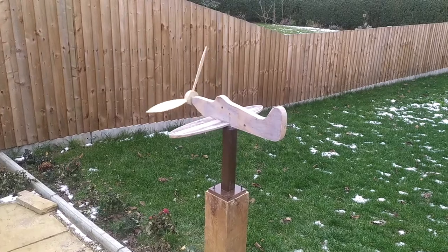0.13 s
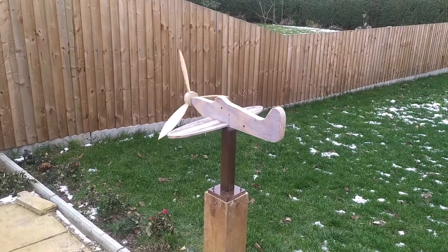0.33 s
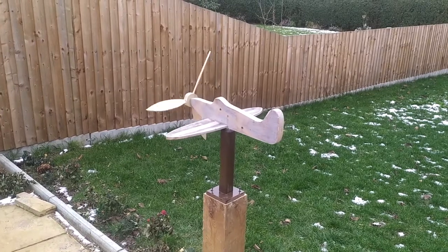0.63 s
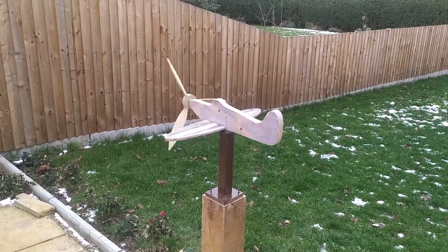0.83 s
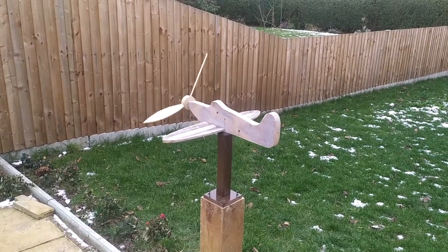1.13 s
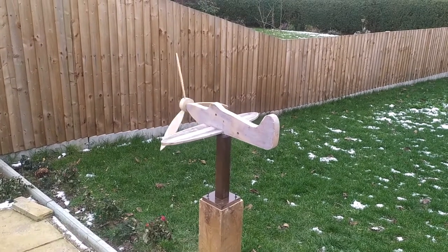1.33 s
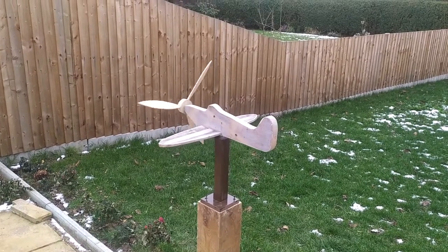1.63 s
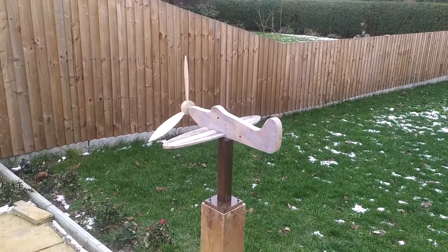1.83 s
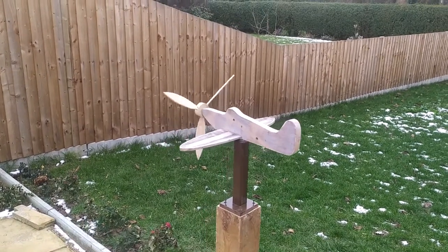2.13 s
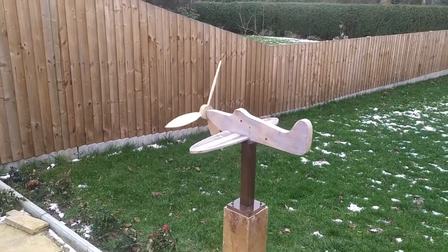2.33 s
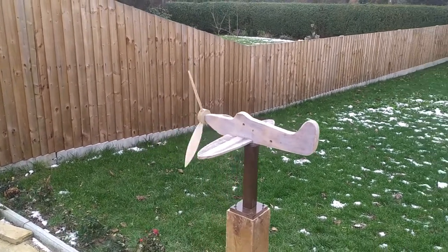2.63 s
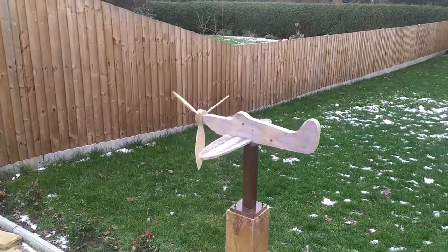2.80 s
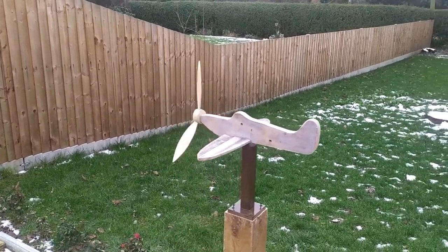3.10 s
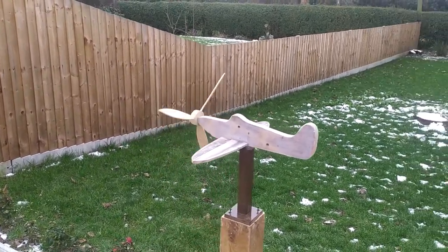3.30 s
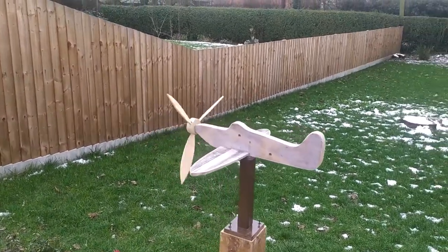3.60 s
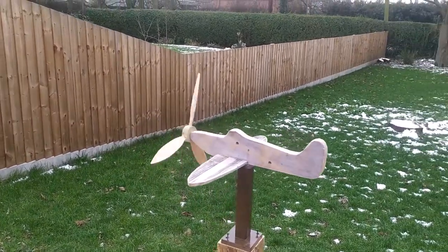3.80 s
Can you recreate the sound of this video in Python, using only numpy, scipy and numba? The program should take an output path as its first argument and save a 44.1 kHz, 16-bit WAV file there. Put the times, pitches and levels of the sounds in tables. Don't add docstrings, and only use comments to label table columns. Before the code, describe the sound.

Wind buffeting dominates, uneven between left and right, with low flutter, knocks and snaps, a brief lull and a strong distorted gust near three seconds; soft leaf hiss, distant town hum and tiny chirps lie underneath.

```python
import sys
import numpy as np
from scipy import signal
from scipy.io import wavfile
from numba import njit

SR = 44100
rng = np.random.default_rng(int(sys.argv[2]) if len(sys.argv) > 2 else 0)


def unload_wav(signal):
    wavfile.write(
        sys.argv[1],
        SR,
        np.round(np.clip(np.atleast_2d(signal).T, -1, 1) * 32767).astype(np.int16),
    )


def volts(x):
    e = np.asarray(x, float) / 20
    return 10 ** e


N = 174195
RUN_IN = 4000


def to_level(x, db):
    return x * volts(db) / np.sqrt(np.mean(x ** 2))


def run_in(x):
    lead = [(0, 0)] * (x.ndim - 1) + [(RUN_IN, 0)]
    return np.pad(x, lead, "reflect")


@njit
def moving_filter(x, hz, damping):
    out = np.empty((2, len(x)))
    band, low = 0., 0.
    for i in range(len(x)):
        g = np.tan(np.pi * hz[i] / SR)
        v = (band + g * (x[i] - low)) / (1 + g * (g + damping))
        out[0, i] = low + g * v
        out[1, i] = damping * v
        band, low = 2 * v - band, low + 2 * g * v
    return out


def walk(rate):
    smoother = signal.butter(2, rate / 2, fs=SR, output="sos")
    wander = signal.sosfilt(smoother, rng.standard_normal(N + SR))[SR:]
    return wander / wander.std()


def kink(kicks, top_hz):
    ring_hz = 360
    dull = moving_filter(kicks, np.full(N, 1. * ring_hz), 1.6)[0]
    return moving_filter(dull, np.clip(top_hz, 300, 12000), 1.5)[0] * SR / ring_hz


def buffet(t, eddies, side):
    # start_s, level_db, left_minus_right_db
    breeze = [
        (0.0, -20, 1),
        (1.96, -27, 10),
        (2.72, -28, 6),
        (3.04, -16, 6.5),
        (3.95, -30.5, 5.5),
    ]
    breeze_s, breeze_db, pan_db = np.array(breeze).T
    u = t[::32]
    swirl_db = 3 * walk(16.6)[::32]
    power = volts(np.interp(u, breeze_s, breeze_db + side * pan_db / 2) + 4 + swirl_db) ** 2
    speed = power * 2.5
    for start_s, length_s, level_db, eddy_speed_db in eddies:
        spread_s = 0.59 * length_s
        puff = volts(level_db + 2) ** 2 * np.exp(-np.abs((u - start_s) / spread_s) ** 3.07)
        power = power + puff
        speed = speed + puff * eddy_speed_db
    speed_db = np.interp(t, u, np.minimum(speed / power, 9))
    power = np.interp(t, u, power)

    flutter_db = 1.88 * speed_db / 8 * walk(108)
    corner_hz = np.clip(44.8 * volts(2 * (speed_db + flutter_db)), 30, 2500)
    grain = to_level(rng.standard_normal(N) * volts(3.5 * rng.exponential(size=N)), 0)
    push = grain * np.sqrt(power * SR / corner_hz / 2)
    air = moving_filter(run_in(push), run_in(corner_hz), 1.73)[0]
    fine_hz = np.clip(5 * corner_hz, 30, 18000)
    rumble = moving_filter(air, run_in(fine_hz), 1.53)[0][RUN_IN:]

    gale_db, kicks_per_s = -12, 700
    kicks = (rng.random(N) < kicks_per_s / SR) * rng.standard_normal(N)
    kicks = kicks * volts(2.5 * rng.exponential(size=N))
    strength = power / volts(gale_db) * volts(-50 + 3.5 * speed_db)
    return rumble + kink(kicks * strength, 4.77 * corner_hz * power / volts(gale_db) ** 2)


def wind(t):
    # centre_s, length_s, level_db, air_speed_db (over calm)
    left_eddies = [(0.282, 0.0087, -22, 12), (0.391, 0.023, -11.5, 5), (0.554, 0.016, -16.5, 6),
                   (0.624, 0.034, -19.5, 7), (0.718, 0.035, -8.5, 3.5), (0.758, 0.049, -15.5, 5.5),
                   (0.972, 0.068, -10.5, 2.5), (1.028, 0.031, -16.5, 7.5), (1.191, 0.04, -9, 2.5),
                   (1.374, 0.03, -14, 4), (1.567, 0.038, -9, 4), (1.645, 0.024, -10, 6.5),
                   (1.705, 0.059, -17, 6.5), (1.897, 0.096, -13, 3.5), (1.946, 0.07, -19.5, 8.5),
                   (2.108, 0.074, -17.5, 4), (2.253, 0.012, -11.5, 4), (2.467, 0.027, -19.5, 8),
                   (3.014, 0.051, -13.5, 13), (3.047, 0.024, -11.5, 13), (3.114, 0.078, -13, 9.5),
                   (3.242, 0.026, -9.5, 7), (3.285, 0.02, -9, 5.5), (3.418, 0.022, -8.5, 6),
                   (3.45, 0.043, -16.5, 6.5), (3.571, 0.017, -24.5, 10.5), (3.695, 0.0092, -29, 19),
                   (3.942, 0.075, -14, 4.5)]
    right_eddies = [(0.0, 0.012, -7, 5.3), (0.017, 0.0047, -14, 7.8), (0.095, 0.025, -13.5, 5.2),
                    (0.204, 0.021, -15, 3.65), (0.338, 0.037, -10.5, 3.57), (0.412, 0.024, -20, 4),
                    (0.422, 0.03, -23.5, 8.6), (0.532, 0.016, -19, 16.7), (0.605, 0.015, -12.5, 6.3),
                    (0.66, 0.12, -19, 6.3), (0.705, 0.02, -14.5, 6.2), (0.645, 0.32, -15.5, 2.3),
                    (0.833, 0.046, -14, 7.06), (0.917, 0.053, -13, 5.95), (0.991, 0.046, -11, 3.67),
                    (1.127, 0.031, -22.5, 20), (1.128, 0.083, -13, 4.13), (1.366, 0.042, -10, 1.3),
                    (1.496, 0.039, -10, 2.2), (1.661, 0.044, -19.5, 2.4), (2.027, 0.0079, -15, 3.4),
                    (2.79, 0.037, -11, 0.85), (2.879, 0.014, -15, 4.5), (2.933, 0.019, -30, 3.7),
                    (2.976, 0.011, -19, 7.2), (3.086, 0.023, -10.5, 5.5), (3.171, 0.029, -13.5, 4.8),
                    (3.227, 0.009, -21.5, 11), (3.184, 0.38, -18, 4.3), (3.432, 0.046, -6, 3.4),
                    (3.515, 0.014, -22, 4), (3.632, 0.028, -14.5, 1.45)]
    return np.array([buffet(t, left_eddies, 1), buffet(t, right_eddies, -1)])


def coloured(points):
    point_hz, point_db = np.array(points).T
    out, likeness = 0, 0.1
    for hz in np.geomspace(300, 15000, 11):
        mid, side = (moving_filter(rng.standard_normal(N), np.full(N, hz), .5)[1] for _ in range(2))
        db = np.interp(np.log(hz), np.log(point_hz), point_db, left=-40) + 2.0 * walk(1.58)
        pair = np.sqrt(1 + likeness) * mid + np.sqrt(1 - likeness) * side * np.array([[1], [-1]])
        out = out + volts(db) * pair
    return out


def hedge(t):
    # start_s, level_db, left_minus_right_db, top_hz
    hiss = [(0, -59.5, 9.5, 15000), (.3, -53.5, 5.5, 15000), (.55, -53.5, 9, 14000), (.72, -53, 8, 15000),
            (.85, -61, 12, 14000), (1.3, -58.5, 3.5, 14000), (1.7, -58.5, 4, 14000), (2.1, -63, 6.5, 13500),
            (2.6, -62.5, 5, 13500), (3, -60.5, 9, 13500), (3.15, -59.5, 1.5, 10000),
            (3.95, -63.5, 5, 11500)]
    # band_hz, level_db
    leaf_colour = [(1470, -18), (2500, -32), (3890, 7.5), (5010, -7.5), (9950, 11), (13800, -66),
                   (14500, 26), (15500, -16.5)]
    start_s, level_db, pan_db, top_hz = np.array(hiss).T
    pan = np.interp(t, start_s, pan_db) / 2
    top = np.interp(t, start_s, top_hz)
    leaves = np.array([moving_filter(x, top, 1.4)[0] for x in to_level(coloured(leaf_colour), 0)])
    rustle_db = 1.5 * walk(22)
    return leaves * volts(np.interp(t, start_s, level_db) + rustle_db + np.array([pan, -pan]))


def town_and_road():
    # band_hz, level_db
    town_colour = [(300, -16), (700, 6.5), (1200, -13.5), (1900, 20.5), (2500, -35), (4000, -1.5),
                   (8000, -37)]
    tyre_band = signal.butter(3, [1300, 2120], "band", fs=SR, output="sos")
    road = signal.sosfilt(tyre_band, rng.standard_normal((2, N)))
    return to_level(coloured(town_colour), -57) + to_level(road, -63.5)


def knocks(t):
    # start_s, peak_db, left_minus_right_db
    table = [(0.012, -36, -16), (0.089, -26.5, -18), (0.342, -25, 2), (0.391, -25, 5), (0.517, -19, -20),
             (0.533, -24, -17), (0.604, -24.5, -7), (0.681, -30, 11), (0.698, -16, 10), (0.759, -26, 4),
             (0.817, -24, -22), (0.909, -22, -20), (0.971, -29, 11), (0.992, -18, -4.5), (1.02, -19, 19),
             (1.046, -16, 20.0), (1.091, -33, -14.0), (1.12, -18, -22.0), (1.365, -39, 14.5),
             (1.546, -18, 26.5), (1.636, -21, 26), (1.707, -31, 19.5), (1.893, -26, 17.0), (1.906, -22, 25),
             (1.94, -25, 24), (1.979, -31.5, 12.0), (2.452, -45, 18), (2.47, -24, 22), (2.789, -27.5, -8),
             (2.965, -26, 3), (3.221, -22, 9), (3.247, -19, 17), (3.279, -30, 11), (3.402, -35, 4.5),
             (3.416, -17.5, -1.5), (3.892, -26, 17), (3.919, -40, 10.5)]
    rise_s, fall_s = 0.0022, 0.0033
    out = np.zeros((2, N))
    for (start_s, peak_db, pan_db), chance in zip(table, rng.standard_normal((len(table), 2))):
        on = (t > start_s) & (t < start_s + .05)
        u = t[on] - start_s
        hz = 617 * np.exp(0.27 * chance[0])
        wobble = np.sin(2 * np.pi * hz * u * (1 - 8 * u)) * np.sign(chance[1])
        swell = (1 - np.exp(-u / rise_s)) * np.exp(-u / fall_s)
        gain = volts(peak_db + 5.5 + np.minimum(0, np.array([[pan_db], [-pan_db]])))
        out[:, on] += gain * wobble * swell
    return out


def gliding_notes(t, table, trill_db, waver_share):
    out = np.zeros(N)
    waver = waver_share * walk(160)
    trill = volts(trill_db * walk(90))
    for start_s, length_s, pitch_hz, level_db, end_ratio in table:
        on = (t >= start_s) & (t < start_s + length_s)
        u = (t[on] - start_s) / length_s
        hz = pitch_hz * end_ratio ** u * (1 + waver[on])
        out[on] += volts(level_db) * np.sin(np.pi * u) ** 0.2 * np.sin(2 * np.pi * np.cumsum(hz) / SR)
    out = out * trill
    tail_s, fade_s = np.arange(SR // 4) / SR, .2
    echo = rng.standard_normal((2, len(tail_s))) * volts(-60 * tail_s / fade_s)
    echo *= volts(-3) / np.sqrt(np.sum(echo[0] ** 2))
    return out + signal.fftconvolve([out], echo, axes=1)[:, :N]


def chirps(t):
    # start_s, length_s, pitch_hz, level_db, end_pitch_over_start_pitch
    table = [(0.026, 0.032, 7840, -57, 0.98), (0.183, 0.078, 8250, -56, 1.0),
             (0.158, 0.21, 5950, -66.5, 0.98), (0.827, 0.11, 8530, -66, 0.93),
             (1.608, 0.072, 10800, -67, 0.93), (1.666, .035, 9500, -66, 0.89),
             (1.757, 0.037, 9150, -62, 1.0), (1.775, 0.13, 9540, -60, 1.0), (1.89, 0.046, 9820, -71, 1.05),
             (2.477, 0.03, 7700, -61, 0.97), (3.171, 0.09, 5780, -64.5, .99),
             (3.258, 0.065, 6000, -59.5, 1.0), (3.662, 0.03, 9300, -70, .99),
             (3.712, 0.065, 8900, -63, .98), (3.72, 0.079, 10750, -66, 0.89),
             (3.817, 0.045, 9600, -62, 0.94), (3.82, 0.034, 8700, -61, 1.24)]
    return gliding_notes(t, table, 4, .009)


def snaps():
    # start_s, level_db, half_left_minus_right_db
    table = [(0.391, -34, 13), (0.6986, -43, 8), (0.82, -24, -12), (0.826, -35, -15), (0.855, -42, -12),
             (0.9928, -42, -1), (1.0211, -38, 14), (1.126, -41, -11), (1.5469, -27, 12), (1.6469, -28, 16),
             (2.9963, -16, 22.5), (3.008, -27, 20), (3.017, -17, 18), (3.024, -32, 20), (3.040, -25, 18),
             (3.05, -37, 18.5), (3.0893, -19.5, 15), (3.105, -25, 15), (3.112, -25.5, 16),
             (3.128, -28.5, 15), (3.139, -36, 16), (3.2464, -41, 18), (3.281, -26, 7.5), (3.418, -28, 14)]
    start_s, level_db, pan_db = np.array(table).T
    kicks = np.zeros((2, N))
    port_db = np.minimum(0, 2 * np.array([pan_db, -pan_db]))
    signs = np.sign(rng.standard_normal(len(start_s)))
    kicks[:, (start_s * SR).astype(int)] = signs * volts(level_db + 6.5 + port_db)
    lag_s, shocks_per_s, fade_s = np.arange(600) / SR, 600, 0.0039
    after = (rng.random(len(lag_s)) < shocks_per_s / SR) * rng.standard_normal(len(lag_s))
    after = after * volts(-2.5) * np.exp(-lag_s / fade_s / 2)
    kicks = kicks + signal.fftconvolve(kicks, [after], axes=1)[:, :N]
    top_hz = np.interp(np.arange(N) / SR, start_s, 8000 * volts(0.47 * (level_db + 35)))
    return np.array([kink(k, top_hz) for k in kicks])


def ticks(t):
    # start_s, level_db, ring_hz, width_hz, left_minus_right_db
    table = [
        (1.465, -56, 3800, 600, 5),
        (1.5335, -39.5, 3770, 500, 4),
        (1.5335, -44.5, 4650, 1000, 1),
        (1.5335, -54, 7200, 900, 3),
        (1.641, -44, 10600, 2500, 14),
        (1.641, -50, 7800, 1500, 9),
        (1.778, -54.5, 5400, 1200, 8),
        (1.966, -54, 13000, 3000, 10),
        (2.553, -47, 9450, 7000, 12),
        (3.642, -54, 11800, 2500, 11),
    ]
    out, grit = 0, rng.standard_normal(N)
    for start_s, level_db, ring_hz, width_hz, pan_db in table:
        ring = grit * (t > start_s) * np.exp(-np.abs(t - start_s) / .002)
        for _ in range(2):
            ring = moving_filter(ring, np.full(N, 1. * ring_hz), width_hz / ring_hz)[1]
        gain = volts(level_db + np.array([[pan_db], [-pan_db]]) / 2)
        out = out + ring / np.abs(ring).max() * gain
    return out


def squeaks(t):
    # start_s, length_s, pitch_hz, level_db, end_pitch_over_start_pitch
    table = [
        (1.99, 0.071, 1460, -54, 0.99),
        (2.32, 0.077, 1460, -64, 0.97),
        (2.49, .05, 1520, -62, 1.0),
        (3.16, 0.05, 1145, -67, 0.83),
        (3.88, 0.11, 1420, -59.5, .96),
    ]
    return gliding_notes(t, table, 4.6, .006)


def scene():
    t = np.arange(N) / SR
    air = wind(t) + knocks(t) + snaps()
    garden = hedge(t) + town_and_road() + chirps(t) + ticks(t) + squeaks(t)
    return air + garden


def band_limit(x):
    return signal.sosfilt(signal.butter(12, 15630, fs=SR, output="sos"), x)


def record(dry):
    low_cut = signal.butter(4, 58.4, "high", fs=SR, output="sos")
    x = signal.sosfilt(low_cut, run_in(dry))[:, RUN_IN:]
    ceiling = .73
    x = x / (1 + np.abs(x / ceiling) ** 6) ** (1 / 6)
    return band_limit(x)


dry = scene()
out = record(dry)
unload_wav(out)
```